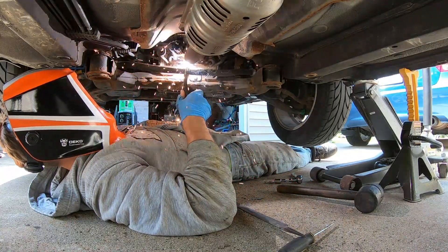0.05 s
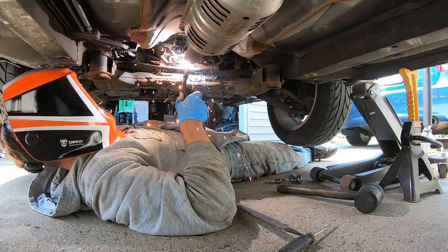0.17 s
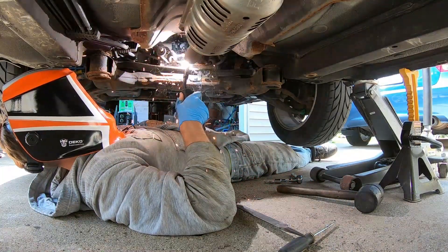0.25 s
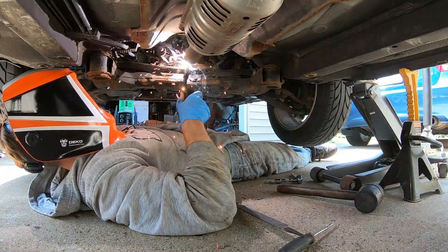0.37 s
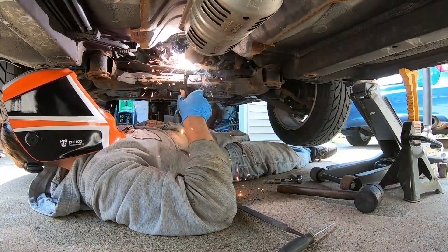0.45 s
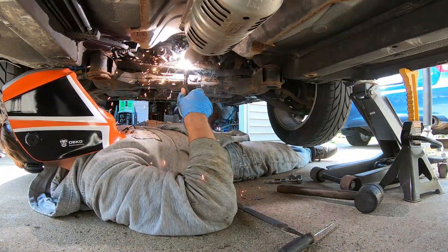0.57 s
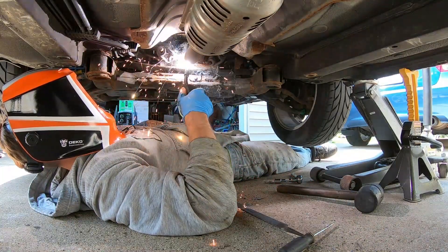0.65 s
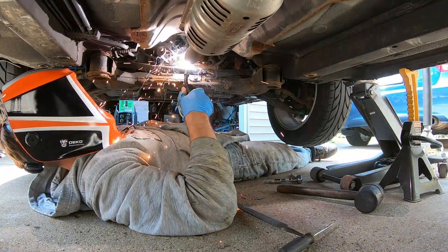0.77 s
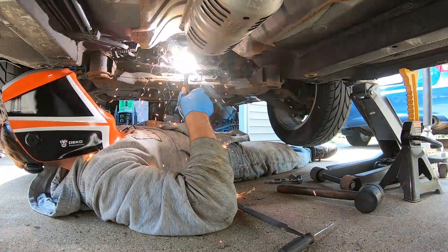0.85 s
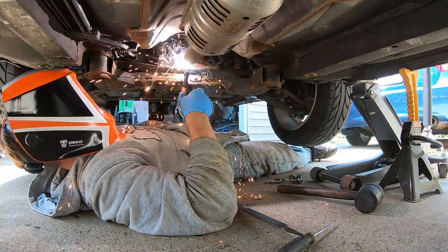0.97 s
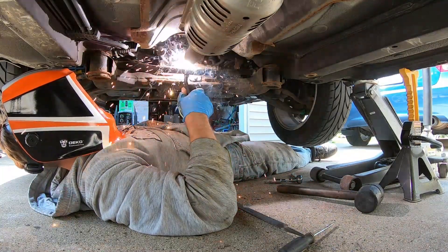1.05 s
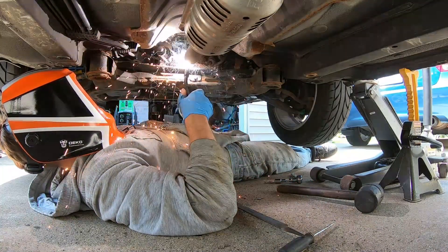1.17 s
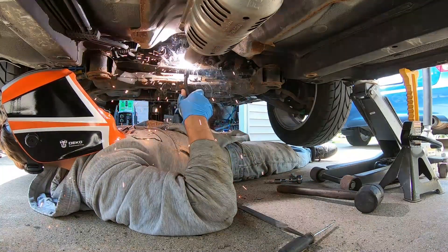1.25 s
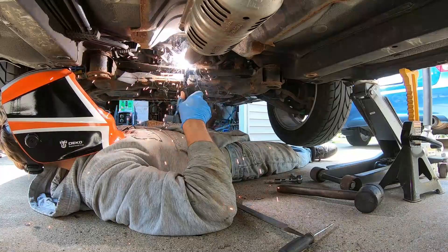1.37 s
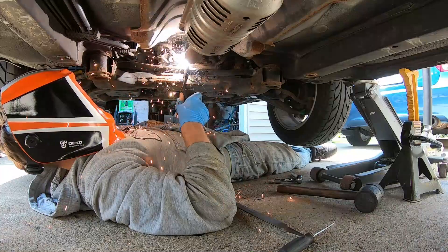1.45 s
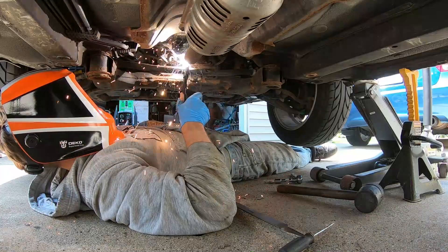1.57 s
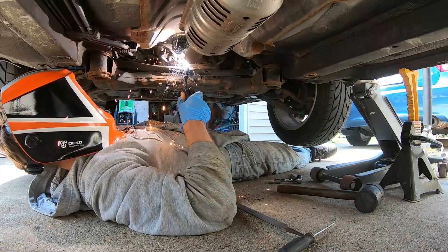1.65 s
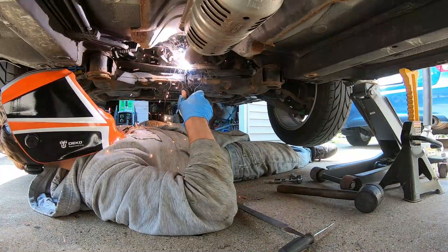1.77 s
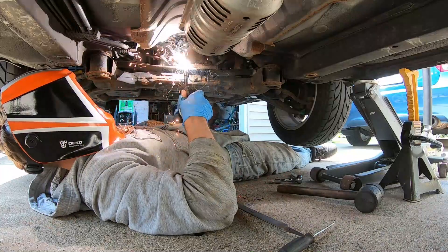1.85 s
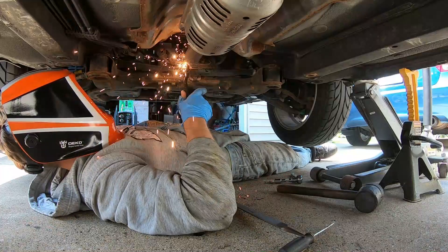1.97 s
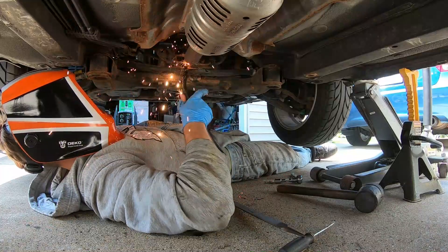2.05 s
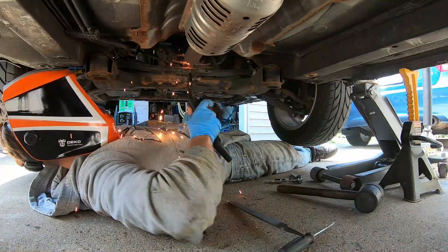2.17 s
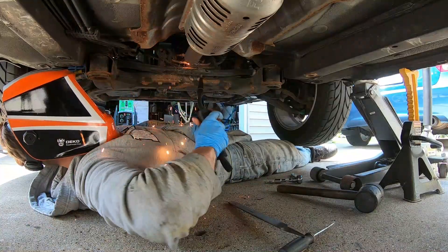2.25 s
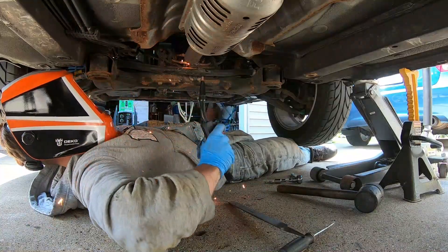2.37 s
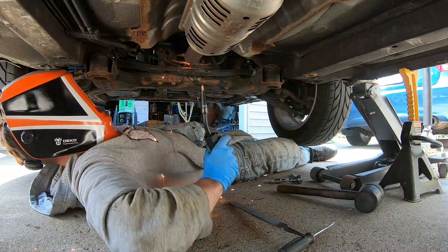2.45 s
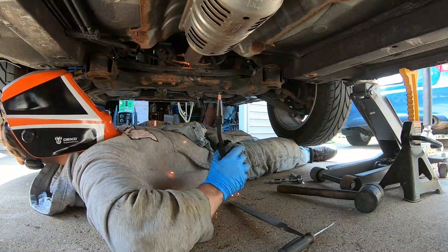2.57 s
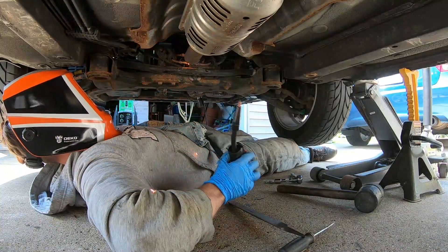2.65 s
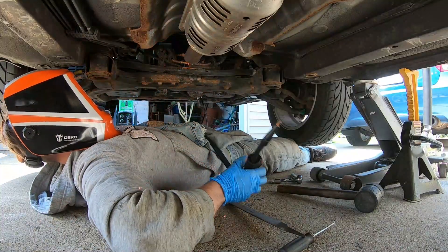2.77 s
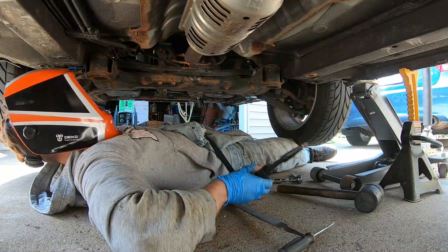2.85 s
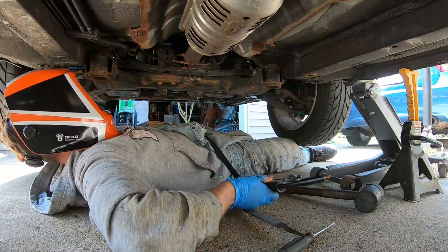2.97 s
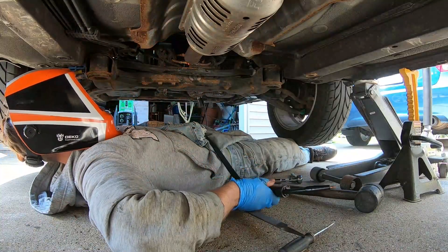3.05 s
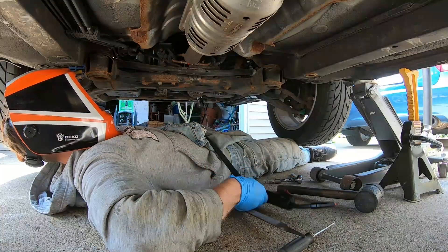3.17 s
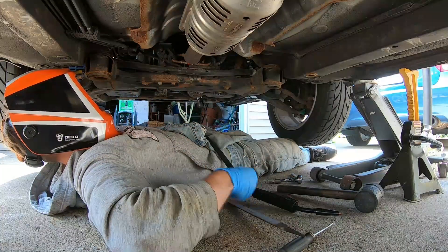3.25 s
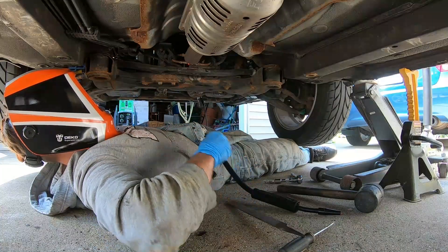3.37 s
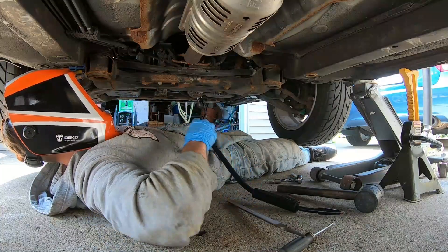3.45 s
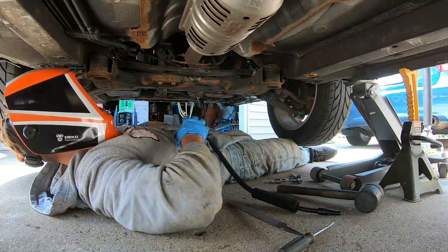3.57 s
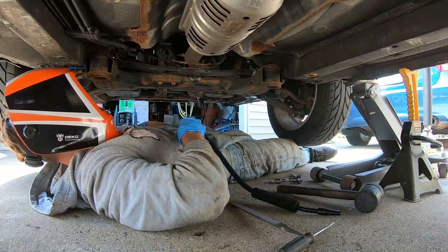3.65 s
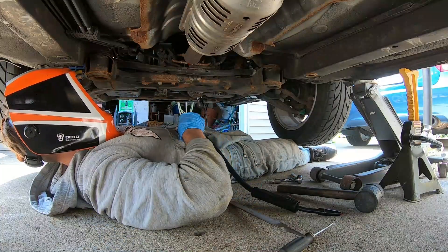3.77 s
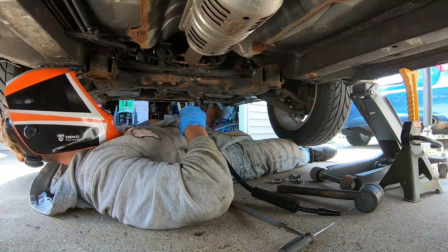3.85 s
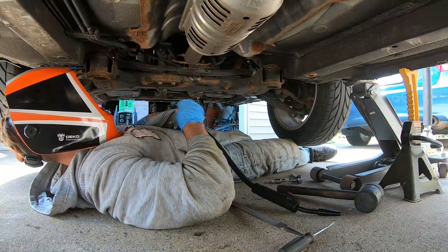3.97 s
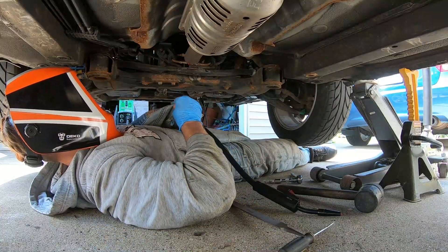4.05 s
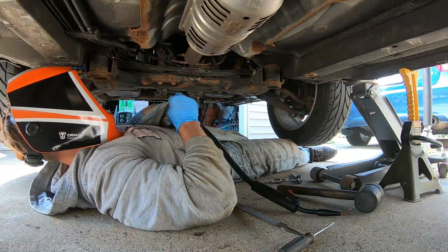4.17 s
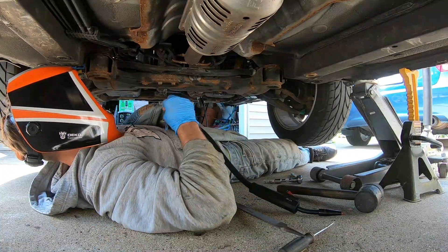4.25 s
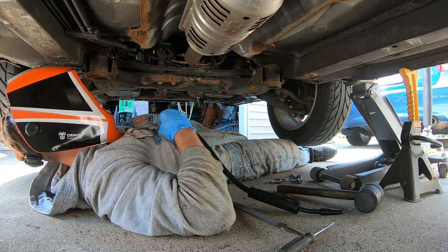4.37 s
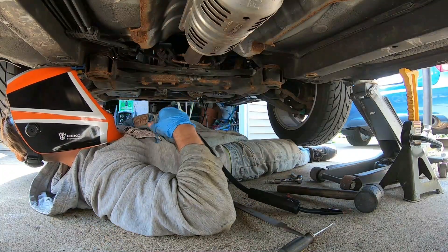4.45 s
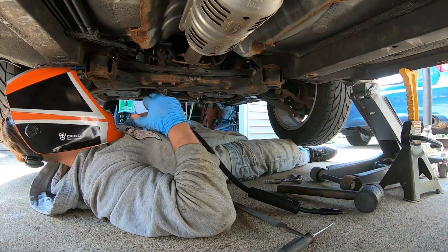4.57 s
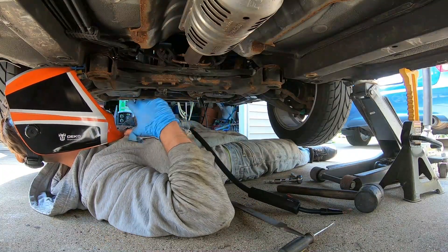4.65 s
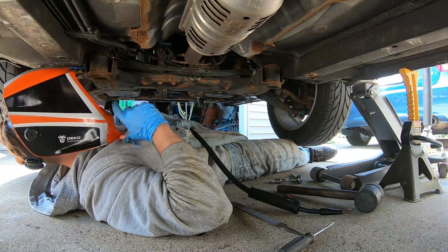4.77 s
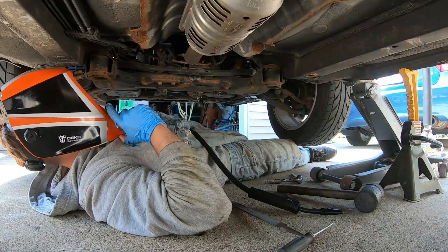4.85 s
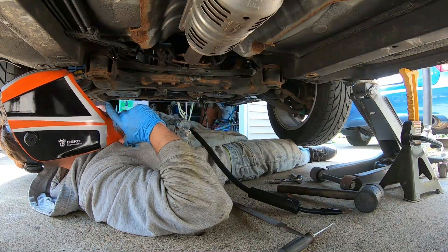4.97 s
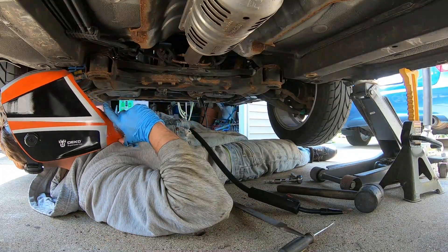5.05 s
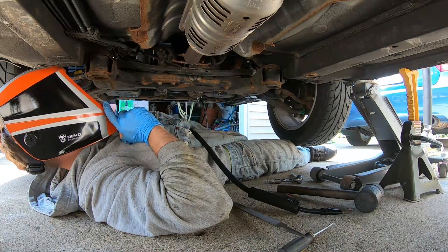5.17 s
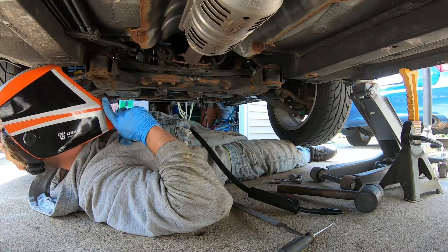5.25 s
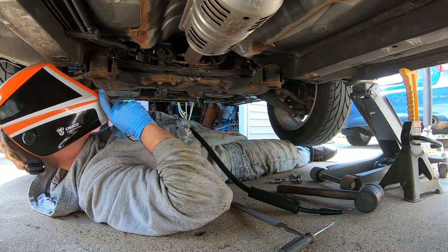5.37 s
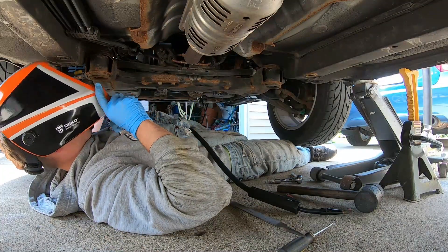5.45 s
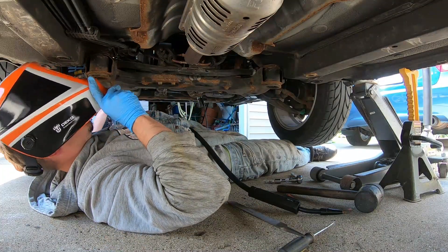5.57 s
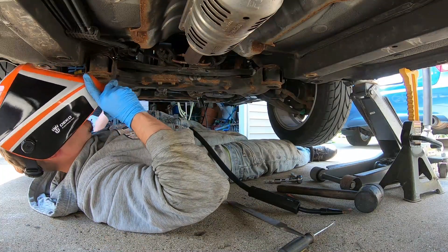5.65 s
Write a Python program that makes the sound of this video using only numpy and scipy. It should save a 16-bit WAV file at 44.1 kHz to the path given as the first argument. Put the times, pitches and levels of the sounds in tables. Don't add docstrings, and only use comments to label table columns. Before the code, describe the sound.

Loud, bright, uneven arc crackle fills the low gap between car floor and concrete, then stops abruptly around two seconds. The quiet reveals two steady whining fans, a low casing hum and distant traffic rumble. Spatter ticks, cloth brushes, and a torch handle raps the concrete at just over three seconds. More rustling, faint metal pings and a dull knock follow, ending in tiny squeaks, heard by one floor-level microphone.

```python
import sys
import numpy as np
from scipy import signal
from scipy.fft import rfft, irfft
from scipy.io import wavfile
from scipy.ndimage import uniform_filter1d

SR = 44100
rng = np.random.default_rng(int(sys.argv[2]) if len(sys.argv) > 2 else 0)


def makeup_ratio(level_db):
    decades = np.asarray(level_db, float) / 20
    return 10 ** decades


def generate_wav(signal):
    frames = np.transpose(np.atleast_2d(signal))
    scaled = np.clip(frames, -1, 1) * 32767
    pcm = np.round(scaled).astype(np.int16)
    wavfile.write(sys.argv[1], SR, pcm)


N = 251811
T = np.arange(N) / SR


def level(x, db):
    return x * makeup_ratio(db) / np.sqrt(np.mean(x ** 2))


def colour(x, points):
    hz, db = np.transpose(points)
    f = np.maximum(np.arange(2049) * SR / 4096, 1)
    cep = irfft(np.interp(np.log(f), np.log(hz), db) * np.log(10) / 20)
    cep[1:2048] *= 2
    cep[2049:] = 0
    return signal.fftconvolve(x, irfft(np.exp(rfft(cep))))[:len(x)]


def band(x, lo_hz, hi_hz):
    return signal.sosfilt(signal.butter(2, [lo_hz, hi_hz], "bandpass", fs=SR, output="sos"), x)


def fade(t, t60_s):
    return np.exp(-np.log(1000) * t / t60_s)


def walk(rate_hz):
    k = int(SR / rate_hz)
    steps = np.repeat(rng.standard_normal(N // k + 1), k)
    w = uniform_filter1d(uniform_filter1d(steps, k), k)[:N]
    return w / w.std()


def add(out, start_s, sound):
    i = int(start_s * SR)
    out[i:i + len(sound)] += sound[:len(out) - i]


def grains(per_s, scatter_db):
    hit = rng.random(N) < per_s / SR
    size = makeup_ratio(scatter_db * rng.exponential(size=N))
    return level(hit * rng.choice([-1., 1.], N) * size, 0)


# pitch_hz, width_hz, level_db
UNDERBODY = [(490, 19.6, -13.5), (782, 41, -6), (892, 72, -7.5), (1215, 71, -0.5), (1420, 51, -8),
             (1900, 26.7, -8.5), (2180, 12, -9), (2317, 124, -2), (2767, 42, -1), (2940, 54, 0),
             (3020, 25.6, -10), (3462, 68.2, 3), (3820, 87, -0.5), (4055, 36, -4), (4384, 87, -9),
             (4685, 180, 0), (4750, 66, -2.5), (5260, 128.3, -3.5), (5720, 37, -16.5), (6040, 25, -0.5),
             (6210, 53, -12), (6600, 100, -10), (7270, 65, -9.5)]
# pitch_hz, level_db
ARC_COLOUR = [(60, -22.5), (100, -3), (300, -3.5), (800, -23), (1700, -25), (2500, 4.5), (4500, -19),
              (5800, -9), (7000, -13), (9500, -1), (11000, -1), (13700, 0.5), (15500, -6.5), (17000, -32)]
BOUNCES = [(3, .5), (7, -.6), (13, .65), (23, -.7), (37, .7), (59, .72)]


def gap_echo():
    bunch_s, tail_t60_s, tail_db, ring_db = .002, .11, -10, 16.5
    onset = slice(0, 170)
    t = T[:SR // 5]
    echo = 1. * (t == 0)
    for lag, g in BOUNCES:
        gap = np.zeros(lag - 1)
        echo = signal.lfilter(np.r_[-g, gap, 1], np.r_[1, gap, -g], echo)
    late = rng.standard_normal(len(t)) * fade(t, tail_t60_s) * (1 - np.exp(-t / bunch_s))
    echo = echo / echo[onset].std() + makeup_ratio(tail_db) * late

    f = np.arange(20, SR / 2, 10.)
    hz, db = np.transpose(ARC_COLOUR)
    power = makeup_ratio(2 * np.interp(np.log(f), np.log(hz), db))
    for pitch_hz, width_hz, level_db in UNDERBODY:
        power = power + makeup_ratio(2 * (level_db + ring_db)) / (1 + (2 * (f - pitch_hz) / width_hz) ** 2)
    own = uniform_filter1d(np.abs(rfft(echo, SR // 10)[2:len(f) + 2]) ** 2, size=8)
    echo = colour(echo, np.c_[f, 10 * np.log10(power / own)])
    echo = echo * (1 + 2.1 * np.exp(-(t / .003) ** 2))

    thump = signal.filtfilt(*signal.butter(3, 1500, fs=SR), echo)
    crack = signal.filtfilt(*signal.butter(3, 1800, "high", fs=SR), echo)
    treble = signal.filtfilt(*signal.butter(2, 8000, "high", fs=SR), echo)
    return [p / p[onset].std() for p in (thump, crack - treble, treble)]


# start_s, crack_db, thump_share_db,
# treble_share_db
SNAPS = [(0.2277, -13.5, -9, 0.5), (0.4924, -18, -11.5, -2.5), (0.5607, -18, -11, -1),
         (.5625, -19.5, -4, -6), (.591, -23.5, -4, 2.5), (0.6072, -23.5, -33, -3.5),
         (0.6788, -24, -5, -0.5), (.7415, -20.5, -12.5, -8), (0.7807, -24.5, -2, -1.5),
         (0.7925, -19.5, -31, 1.5), (0.8502, -17, -27, -3.5), (0.8758, -17, -30, -17.5),
         (0.9218, -15.5, -3, -5), (.98, -15, -10, -3), (1.0699, -16.5, -3.5, -4), (1.0981, -17.5, -6.5, -4),
         (1.1599, -22, -11, -0.5), (1.176, -15.5, -10, 0.5), (1.1945, -15.5, -4, -2),
         (1.2682, -13.5, -10, -3), (1.3247, -18, -7, -3.5), (1.3685, -21.5, -6, 0.5),
         (1.5005, -20, -29, -4), (1.5598, -18, -10.5, -8), (1.736, -16.5, -5, -5),
         (1.7948, -20.5, -3.5, -3), (1.8129, -19, -17, -2.5), (1.8246, -18, -11, -2),
         (1.8897, -15.5, -10, -7.5), (1.9332, -19, -11, -12)]
# start_s, level_db,
# treble_share_db
SMALL_SNAPS = [(.0434, -26, 3), (.0856, -23.5, 1), (.1668, -28.5, 3.5), (.2867, -27.5, -0.5),
               (.2952, -20, -4.5), (.4014, -22.5, 1.5), (.4302, -24.5, 0.5), (.4411, -21, -4), (.4828, -23, 0),
               (.5024, -19, -3), (.5193, -21, -10), (.6174, -23, -2), (.7385, -36.5, -6), (.8722, -25, 3),
               (.9973, -23.5, -6), (1.0023, -28, 1), (1.1127, -28.5, -1.5), (1.2792, -24, -6),
               (1.3655, -32, -4.5), (1.4427, -25, 2), (1.4528, -26.5, -2), (1.4684, -20.5, -7.5),
               (1.4804, -26, -3), (1.4928, -20, -6), (1.5696, -21.5, -0.5), (1.7127, -20.5, -13),
               (1.7689, -27.5, -7), (1.7846, -24.5, -4), (1.8411, -33.5, -9), (1.8605, -26, -10)]
# time_s, sizzle_db
SIZZLE = [(0, -32), (.16, -31.5), (.35, -36), (.47, -31), (.72, -33.5), (.9, -32), (1.6, -35),
          (1.68, -36.5), (1.84, -27.5), (1.985, -32.5)]


def all_sparks(burn_db):
    spits, spit_over_db, spit_spread_db, spit_treble_db = 90, 3.5, -1.5, -2
    small_thump_db, small_spread_db = -9, 3
    first_spit = len(SMALL_SNAPS)
    chance = rng.standard_normal((first_spit + spits, 3))
    when_s = rng.random(spits) * SIZZLE[-1][0]
    spit_db = np.interp(when_s, T, burn_db) + spit_over_db + spit_spread_db * chance[first_spit:, 0]
    treble_db = spit_treble_db + small_spread_db * chance[first_spit:, 1]
    small = np.r_[SMALL_SNAPS, np.c_[when_s, spit_db, treble_db]]
    thump_db = small_thump_db + small_spread_db * chance[:, 2]
    return np.r_[SNAPS, np.insert(small, 2, thump_db, axis=1)]


def arc():
    hush_db, hush_s = -4, .02
    flare_db, flare_t60_s = -9, .096
    sizzle_per_s, sizzle_scatter_db = 1500, 2.1
    sizzle_thump_db, sizzle_treble_db, treble_per_db = -8.5, -5, .83
    steady_db = np.interp(T, *np.transpose(SIZZLE))
    burning = uniform_filter1d(1. * (T >= SIZZLE[0][0]) * (T <= SIZZLE[-1][0]), 400)
    burn_db, flare = steady_db, np.zeros(N)
    for start_s, crack_db, *_ in SNAPS:
        choke = np.clip(1 - (start_s - T) / hush_s, 0, 1) ** .5 * (T < start_s)
        burn_db = burn_db + hush_db * choke
        add(flare, start_s, makeup_ratio(crack_db + flare_db) * fade(T[:SR // 4], flare_t60_s))
    sparks = all_sparks(burn_db)

    flicker_db = 1.2 * walk(60)
    fizz = grains(sizzle_per_s, sizzle_scatter_db) * np.hypot(makeup_ratio(burn_db), flare)
    fizz = fizz * makeup_ratio(flicker_db - 22.5) * burning
    high_db = sizzle_treble_db + treble_per_db * (steady_db + 33)
    kicks = np.array([fizz * makeup_ratio(sizzle_thump_db), fizz, fizz * makeup_ratio(high_db)])

    shapes = rng.standard_normal((len(sparks), 40))
    for (start_s, level_db, thump_db, treble_db), z in zip(sparks, shapes):
        spark = .13 * z * fade(T[:40], .003)
        spark[0] = 1
        for kick, share_db in zip(kicks, (thump_db - .3, 0, treble_db + 2.6)):
            add(kick, start_s, spark * makeup_ratio(level_db + share_db - 3.2))
    return sum(signal.fftconvolve(k, p)[:N] for k, p in zip(kicks, gap_echo()))


# multiple, level_db
FAN_A = [(1, -63), (2, -58.5), (5, -88.5), (6, -76.5), (7, -73.5)]
FAN_B = [(4, -64.5), (6, -71.5)]
# pitch_hz, width_hz, level_db
CASE_HUM = [(72, 15, -52.5), (109, 18, -53.5), (250.8, 53, -59.5), (407, 41, -59), (477, 5.3, -71)]
ARM_MOVES_S = (2.7, 5.25)
A3_DB = (-64, -62, -74)
A4_DB = (-80, -68, -76)
B5_DB = (-66, -67, -62.5)


def fans():
    fan_a_hz, fan_b_hz, arm_move_s = 530.5, 304.5, .3
    moves_s = np.add.outer(ARM_MOVES_S, [-arm_move_s / 2, arm_move_s / 2]).ravel()
    a3_db, a4_db, b5_db = (np.interp(T, moves_s, np.repeat(db, 2)[1:-1]) for db in (A3_DB, A4_DB, B5_DB))
    tones_a = [*FAN_A, (3, a3_db), (4, a4_db)]
    tones_b = [*FAN_B, (5, b5_db)]
    out = 0
    for blade_hz, tones in ((fan_a_hz, tones_a), (fan_b_hz, tones_b)):
        turn = np.cumsum(blade_hz * (1 + .000734 * walk(1.5))) / SR
        for k, level_db in tones:
            tone = np.sqrt(2) * np.sin(2 * np.pi * (k * turn + rng.random()))
            out = out + tone * makeup_ratio(level_db + .5 * walk(.54))
    for pitch_hz, width_hz, level_db in CASE_HUM:
        hum = band(rng.standard_normal(N), pitch_hz - width_hz / 2, pitch_hz + width_hz / 2)
        out = out + level(hum, level_db)
    return out


# pitch_hz, density_db_per_hz
YARD = [(15, -38.5), (25, -9), (102, 2), (200, -9), (416, -11.5), (962, -21), (1070, -21), (1290, -24),
        (1560, -17), (1700, -21.5), (3820, -28), (5570, -31), (8140, -52), (10400, -44.5), (16000, -50)]


def yard():
    return level(colour(rng.standard_normal(N), YARD), -47.5) * makeup_ratio(.12 * walk(2.3))


# peak_s, rise_s, fall_s (both over 20
# dB), level_db, body_share_db
RUSTLE = [(2.0, .01, 1.2, -65.5, 8), (2.1, .015, -0.5, -64, -17), (2.2, .12, -0.3, -56, 1.5),
          (2.25, .03, -0.13, -56, 4.5), (2.43, .1, 0, -77, -14), (2.68, .6, 0, -65, 5.5),
          (2.91, .15, .1, -67, 0), (3.155, .03, 0.27, -55, 2), (3.21, .1, 0.14, -54, 4.5),
          (3.251, .005, .01, -43, 13), (3.37, .15, .15, -70, -3), (3.66, .025, .18, -68, -1.5),
          (3.868, .03, .03, -59, 3), (4.23, .2, 0.3, -68, 7), (4.49, .07, -0.2, -61.5, 1.5),
          (4.699, .18, 0, -57, 4.5), (5.02, .11, 0.13, -60.5, 4.5), (5.19, .03, 0.87, -72, 7),
          (5.68, .07, 2.5, -68.5, -3)]
# pitch_hz, level_db
CLOTH = [(700, -37.5), (2500, 0), (4000, 7.5), (6500, 3.5), (10000, -16), (14000, -17), (16000, -15)]


def rustle():
    cloth = colour(rng.standard_normal(N) + .5 * grains(900, 2.0), CLOTH)
    body = level(band(cloth, 500, 9800), 0)
    sheen = level(band(cloth, 9400, 14000), 0)
    out = 0
    for peak_s, rise_s, fall_s, level_db, body_db in RUSTLE:
        slope_db = 20 * np.minimum((T - peak_s) / rise_s, (peak_s - T) / np.hypot(fall_s, .04))
        out = out + makeup_ratio(level_db + slope_db) * (sheen + makeup_ratio(body_db) * body)
    return out * makeup_ratio(1.3 * walk(30))


# start_s, level_db, centre_hz, treble_share_db, t60_s
TICKS = [(2.103, -46.5, 4000, 14, 0.058), (2.2436, -44, 5000, 1.0, 0.1), (2.249, -38, 5500, -9.5, 0.089),
         (2.431, -52, 4070, 12, 0.1), (3.362, -55.5, 4000, -38, 0.17), (3.866, -55, 3500, -10, 0.082),
         (4.822, -53.5, 3920, -11, 0.024), (4.964, -58, 4100, -12, 0.033), (5.19, -49.5, 3020, -13.5, .03),
         (5.2075, -33.5, 1000, -38, 0.03), (5.208, -41, 650, -40, .05), (5.2125, -42, 1900, -23, 0.034),
         (5.208, -59, 3300, -25, 0.025)]
# start_s, level_db, pitch_hz, t60_s
PINGS = [(3.74, -52, 960, .12), (4.352, -44, 930, .1), (5.21, -50, 930, .1), (3.41, -62, 10600, .15),
         (3.40, -65, 12700, .2), (5.635, -55, 3800, .08), (5.647, -50, 3850, .07), (5.658, -54, 4550, .08),
         (5.667, -53, 3750, .07), (5.681, -52, 3600, .07), (2.246, -39, 4500, .07), (2.245, -40, 5700, .06),
         (2.247, -43, 3200, .07)]


def ticks():
    out, t = np.zeros(N), T[:SR // 5]
    for start_s, level_db, centre_hz, treble_db, t60_s in TICKS:
        z = rng.standard_normal((2, len(t))) * (fade(t, t60_s) + .47 * fade(t, .022))
        knock = 3.45 * band(z[0], centre_hz / 2.46, centre_hz * 1.24)
        treble = .47 * makeup_ratio(treble_db) * band(z[1], 7700, 16000)
        add(out, start_s, makeup_ratio(level_db) * (knock + treble))
    for start_s, level_db, pitch_hz, t60_s in PINGS:
        jitter_rad = np.cumsum(rng.standard_normal(len(t))) * .07
        swell = 1 - fade(t, .14 * t60_s)
        ring = np.sin(2 * np.pi * pitch_hz * t + jitter_rad) * fade(t, t60_s) * swell
        add(out, start_s, makeup_ratio(level_db) * ring)
    return out


# start_s, blow_db, tilt_db_per_octave
DROP = [
    (3.2463, -14.5, 1.5),
    (3.2548, -29, -1),
    (3.272, -29, -6),
]
# pitch_hz, level_db, t60_s
TORCH = [(420, -26, .03), (830, -15, .03), (1050, -12, .04), (1138, -12, .06), (1270, -12, .065),
         (1460, -15, .05), (1665, -16, .07), (1783, -11, .06), (2250, -12, .06), (2457, -11, .06),
         (3000, -16, .06), (3950, -22, .08), (4500, -24, .05), (5750, -22, .025)]


def torch():
    out, t = np.zeros(N), T[:SR // 4]
    for start_s, blow_db, tilt_db in DROP:
        body = 0
        for pitch_hz, level_db, t60_s in TORCH:
            strike = makeup_ratio(level_db + tilt_db * np.log2(pitch_hz / 1200)) * rng.choice([-1, 1])
            body = body + strike * np.sin(2 * np.pi * pitch_hz * t) * fade(t, t60_s)
        z = rng.standard_normal((2, len(t)))
        crack = band(band(z[0], 800, 2600), 720, 4200) * fade(t, .12)
        crack = crack + makeup_ratio(-19.5) * band(z[1], 3000, 15000) * fade(t, .03)
        blow = (1 - fade(t, .009)) * (1 + 1.77 * fade(t, .019))
        add(out, start_s, makeup_ratio(blow_db) * (makeup_ratio(4.5) * body + makeup_ratio(3.0) * crack) * blow)
    return out


def scene():
    return (arc() + fans() + yard() + rustle() + ticks() + torch())[None]


def band_limit(x):
    return signal.sosfilt(signal.butter(12, 16820, fs=SR, output="sos"), x)


def record(dry):
    port_hz, port_width_hz, port_depth, top_hz = 8300, 1000, .93, 15900
    peak = signal.lfilter(*signal.iirpeak(port_hz, port_hz / port_width_hz, fs=SR), dry)
    x = np.tanh((dry - port_depth * peak) / 1.6) * 1.6
    x = signal.sosfilt(signal.ellip(5, .3, 18, top_hz, fs=SR, output="sos"), x)
    return band_limit(x)


dry = scene()
out = record(dry)
generate_wav(out)
```